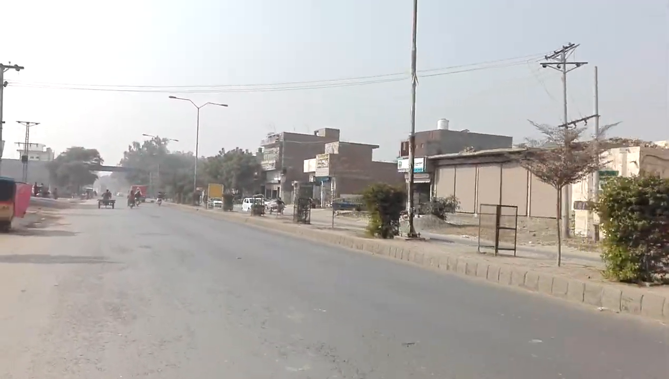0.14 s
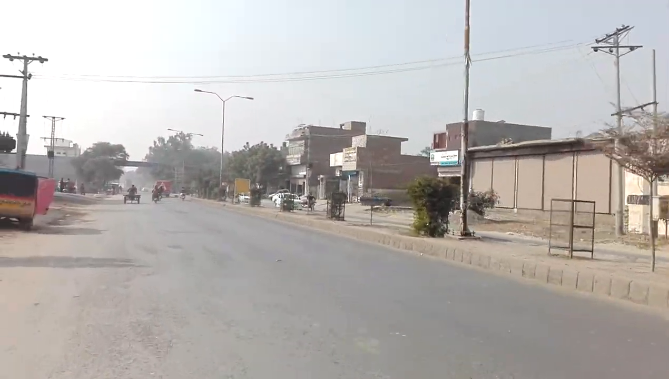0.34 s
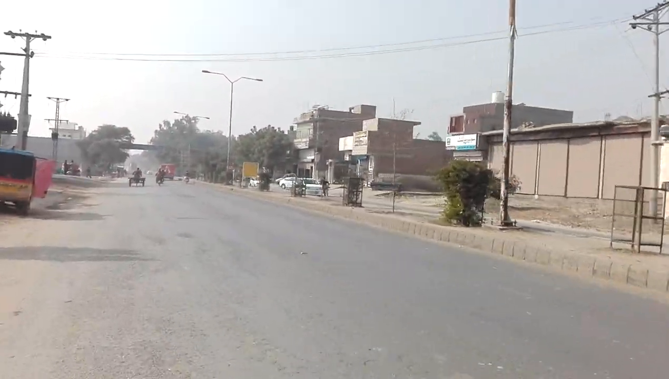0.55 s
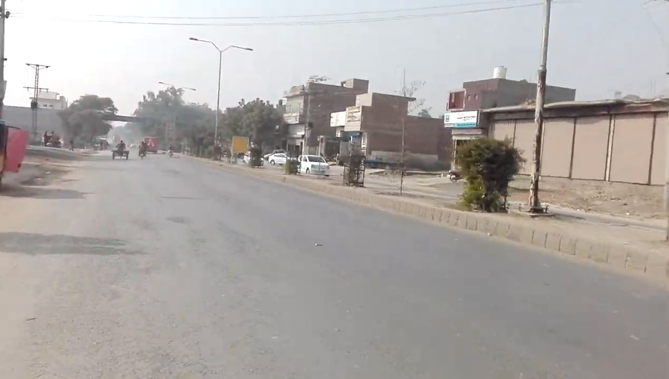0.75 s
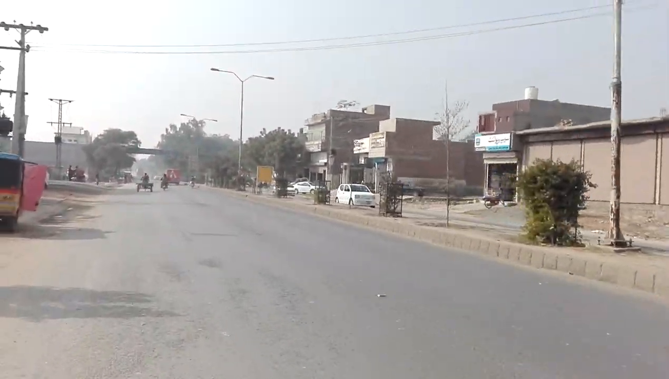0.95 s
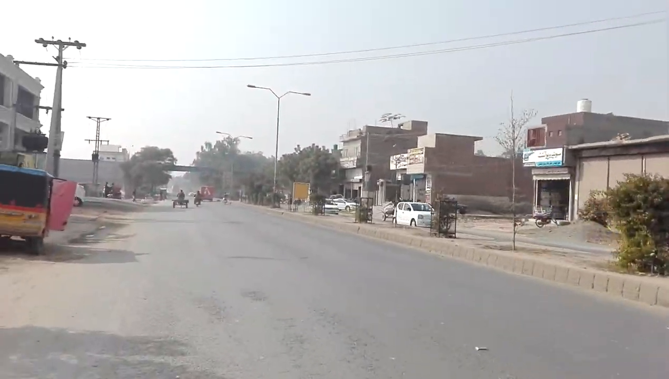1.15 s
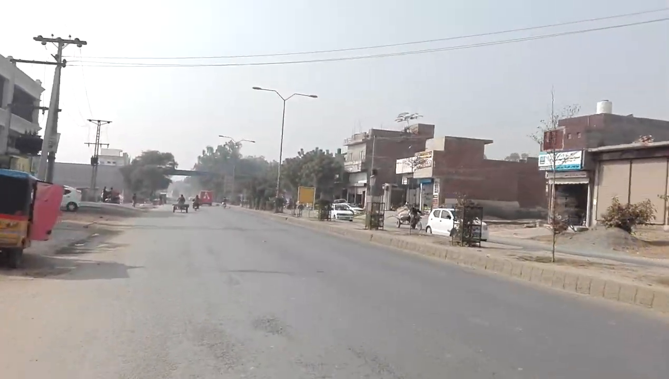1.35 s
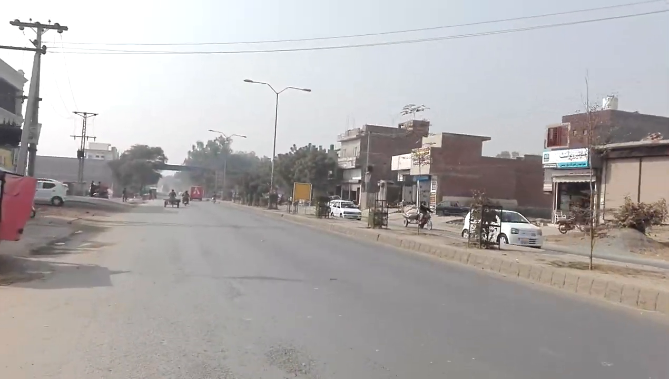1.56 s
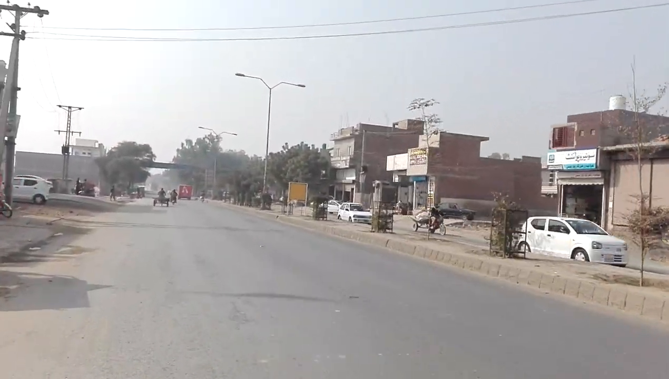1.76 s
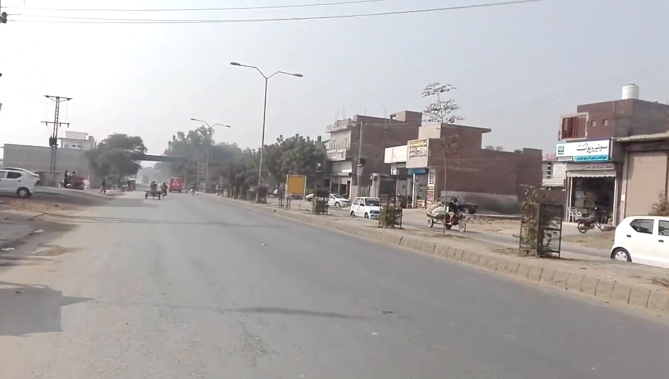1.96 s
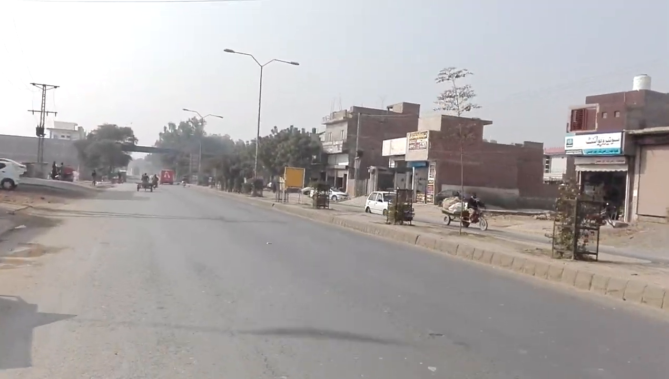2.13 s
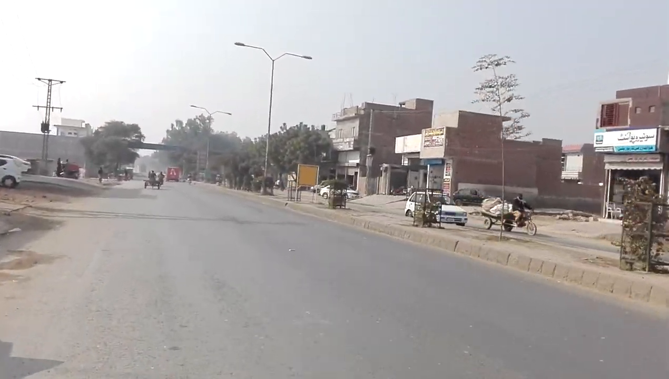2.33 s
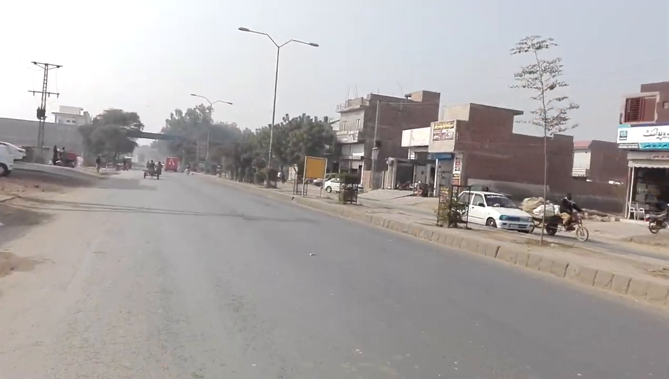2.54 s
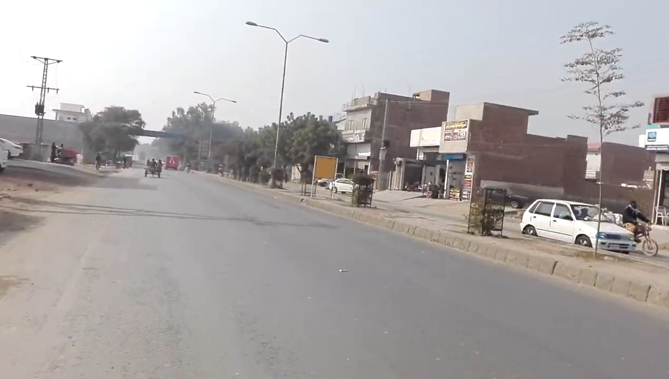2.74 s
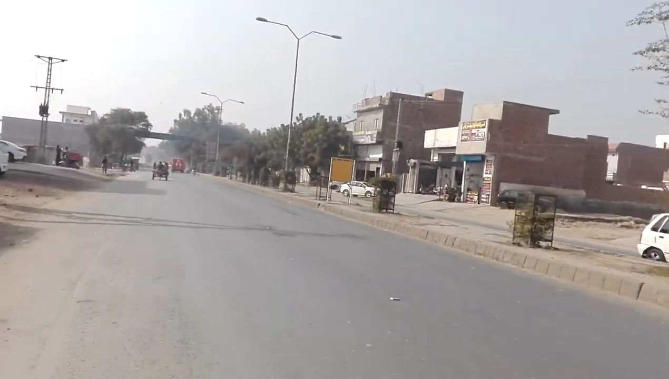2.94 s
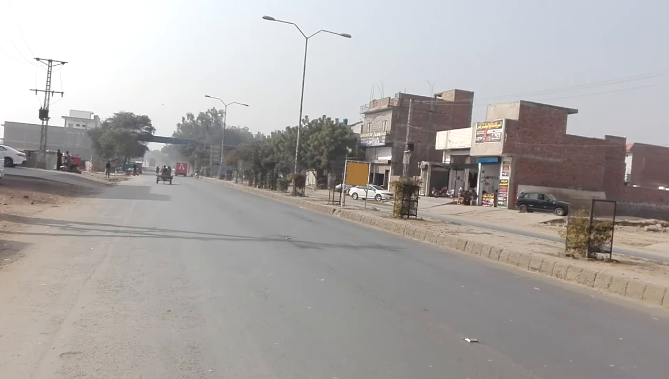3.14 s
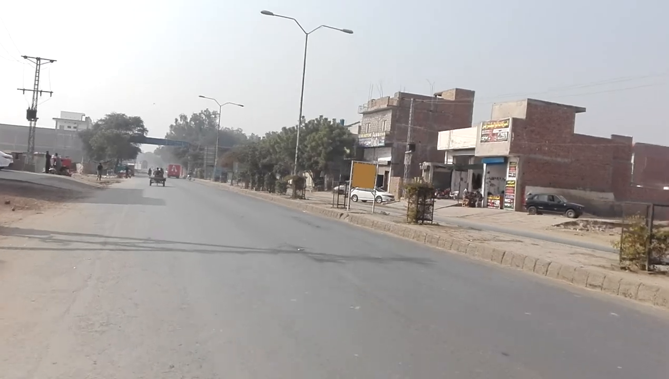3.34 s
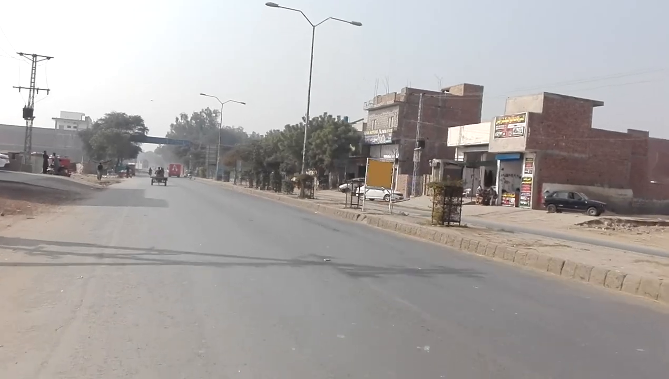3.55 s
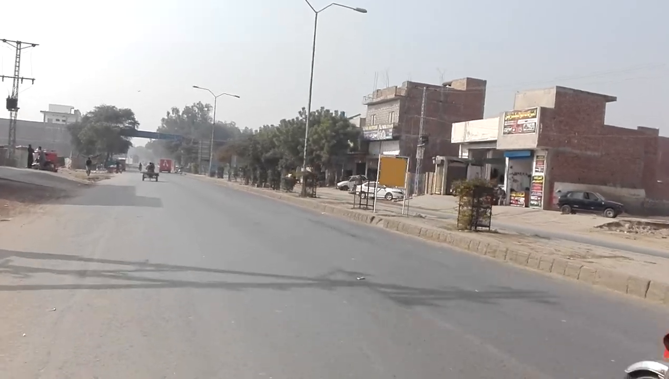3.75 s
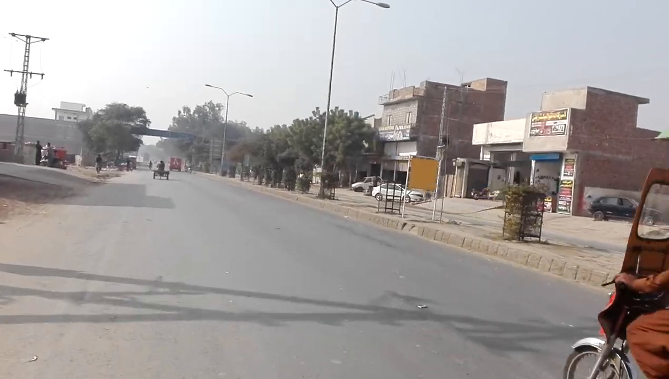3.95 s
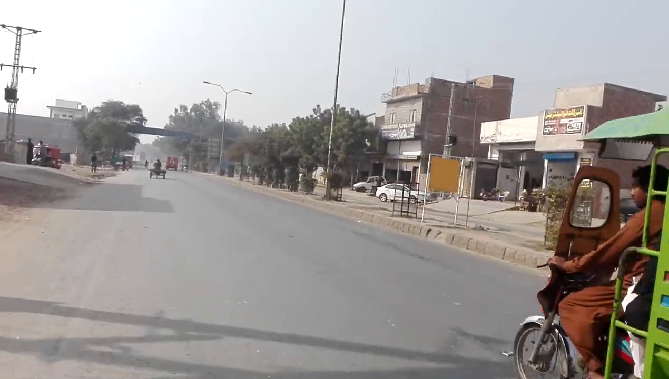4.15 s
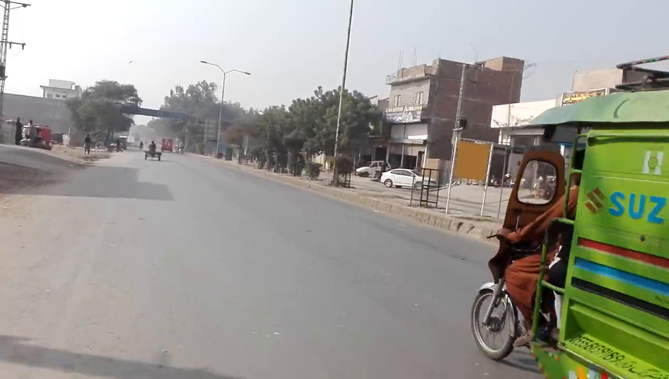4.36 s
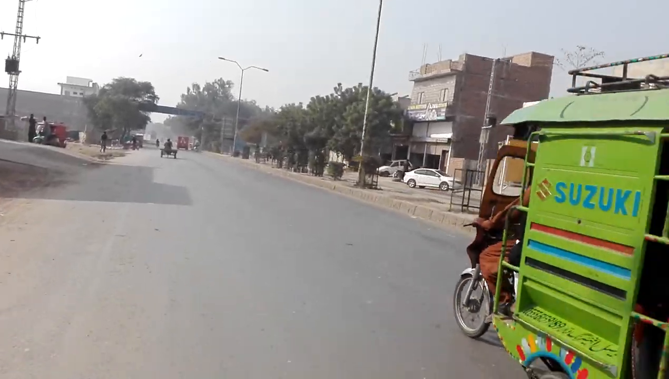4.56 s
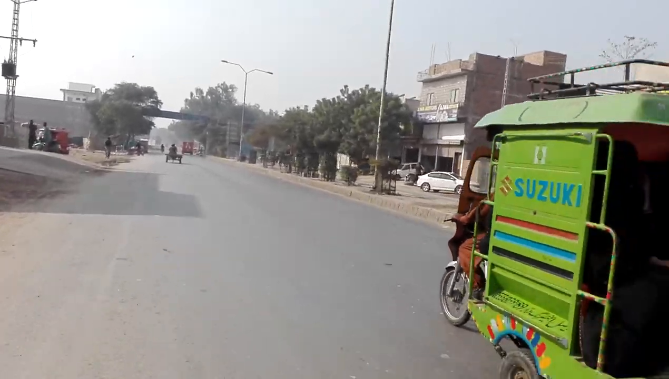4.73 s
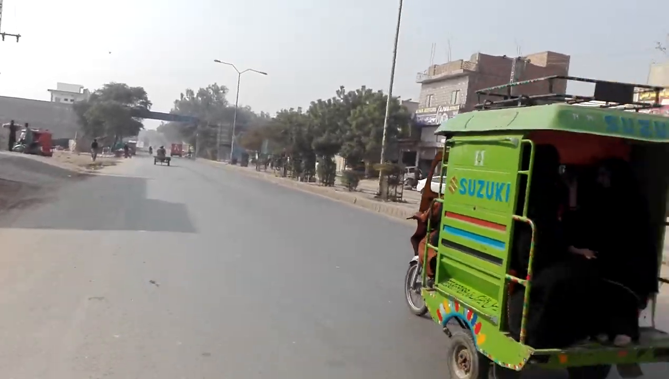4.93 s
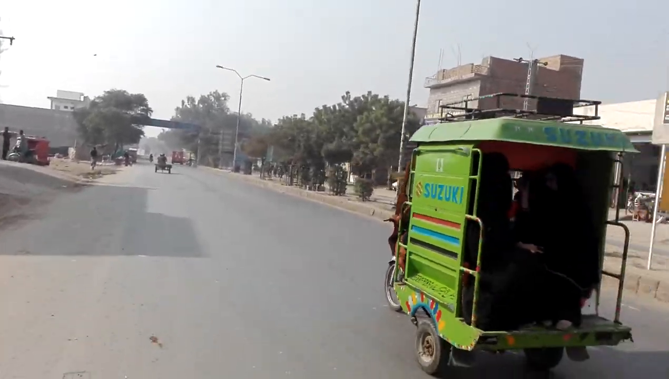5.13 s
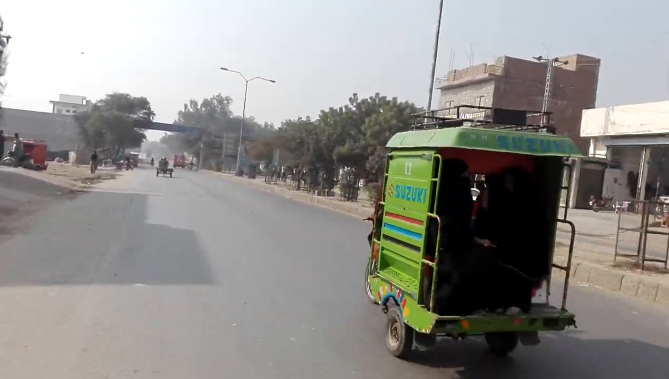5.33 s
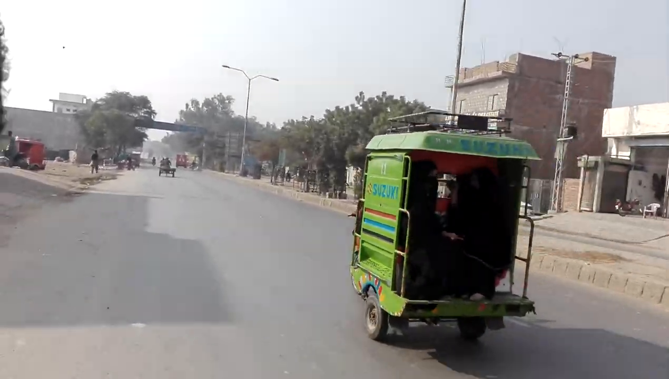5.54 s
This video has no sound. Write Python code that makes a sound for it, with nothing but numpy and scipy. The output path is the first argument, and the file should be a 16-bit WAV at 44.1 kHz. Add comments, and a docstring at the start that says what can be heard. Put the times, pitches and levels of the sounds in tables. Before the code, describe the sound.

Heard from an open vehicle on a wide city road: low traffic rush and gusty wind with dull thumps on a bare microphone. A single-cylinder three-wheeler putters steadily, at first dull and blurred by the street, then louder with a wavering nasal pipe tone. Around four seconds it draws level, its exhaust turning crisp and raspy, then begins to pull ahead. A loose fitting ticks and rattles now and then.

```python
"""A wide city road, heard from an open vehicle: a small single-cylinder three-wheeler comes up and overtakes.
Its exhaust barks about 49 times a second, each firing ringing the pipe and silencer; it is blurred by
the street when far and sharp once past. Sine waves at multiples of the firing rate make its throb.
Shaped noise makes the road's rush, the tyres' hiss and the wind, and single eddies slap the bare microphone.
A loose fitting knocks now and then with short rings."""
import sys
import numpy as np
from scipy import signal
from scipy.fft import rfft, irfft, next_fast_len
from scipy.io import wavfile
from scipy.ndimage import map_coordinates

SR = 44100
rng = np.random.default_rng(int(sys.argv[2]) if len(sys.argv) > 2 else 0)


def dump(signal):
    """Clip the signal to [-1, 1] and save it as 16-bit WAV at the path in sys.argv[1]."""
    limited = np.clip(np.atleast_2d(signal).T, -1, 1)
    pcm = np.round(limited * 32767).astype(np.int16)
    wavfile.write(sys.argv[1], SR, pcm)


def to_linear_factor(level_db):
    """Convert decibel levels (scalar or array-like) to linear amplitude factors."""
    exponent = np.asarray(level_db, float) / 20
    return 10 ** exponent


N = 246519  # length in samples

# Tyres and far traffic. Each row: frequency in Hz, relative level per Hz in dB.
ROAD_SPECTRUM = [(150, -13), (250, 0.5), (414, -1), (561, -22), (1260, 2.5), (1490, -6), (1680, -9),
                 (2640, -16), (2870, -15), (4380, -23), (5640, -68), (8030, -59), (14000, -38)]
ROAD_DB = -49.5
# Escaping gas, also used for tyre hiss. Each row: frequency in Hz, relative level per Hz in dB.
HISS_SPECTRUM = [(3820, -51), (6500, 3.5), (7020, 1), (7980, -4), (10900, -5.5), (12800, -16), (14000, -28)]

# Slow wind pressure. Each row: frequency in Hz, relative level per Hz in dB.
BUFFET_SPECTRUM = [(7.1, -60), (12, 4.5), (36, -1), (54, 5.5), (200, -19), (260, -62.5), (440, -120)]
# Faster wind noise. Each row: frequency in Hz, relative level per Hz in dB.
FLUTTER_SPECTRUM = [(50, -50), (90, 4), (130, 3), (200, -4), (300, -13.5), (500, -24.5), (900, -39),
                    (2000, -54), (5000, -110)]
# Gusts. Each row: time of full strength in seconds, hold in seconds, buffet in dB, flutter in dB.
GUSTS = [(0.0, 0.01, -21, -29.5), (0.232, 0.26, -32, -34), (0.785, 0.65, -27.5, -34),
         (1.754, 0.05, -40, -49), (1.948, 0.36, -34, -54), (2.525, 0.28, -26, -29), (2.99, 0.15, -31, -31),
         (3.506, 0.15, -34, -37), (3.736, 0.18, -28, -28), (4.118, 0.35, -18.5, -23),
         (4.585, 0.037, -24, -22.5), (4.75, 0.24, -29, -27.5), (5.1, 0.18, -25, -23)]
GUST_RISE_S, GUST_FALL_DB_PER_S = 0.048, 77
# Wind between gusts. Each row: time in seconds, buffet in dB, flutter in dB.
CALM_WIND = [(0, -46, -50), (3, -37, -42), (5.59, -28.5, -31.5)]
# Single eddies at the microphone. Each row: start in seconds, peak in dB, time from middle to peak in ms.
SLAPS = [(0.1, -22, 1.4), (0.283, -12, 2.2), (0.422, -15.5, 2), (0.455, -25, 3.1), (0.783, -19, 2.4),
         (0.857, -16.5, 2.5), (1.023, -11, 1.87), (1.155, -12, 1.84), (1.206, -17, 2.5),
         (1.304, -21.5, 2.1), (1.362, -14.5, 2.1), (2.065, -26, 2.2), (2.113, -24, 2.3), (2.573, -17, 1.9),
         (2.609, -13, 2.06), (2.688, -16.5, 2.5), (2.797, -18, 3.1), (4.039, -20, 1.9), (4.12, -18, 2.7),
         (4.154, -11, 2.2), (4.189, -14, 3.3), (4.239, -20, 2.1), (4.358, -13.5, 2.4), (4.419, -11.5, 2.7),
         (4.578, -11.5, 2), (4.649, -16, 2.4), (4.964, -14.5, 2), (5.228, -13.5, 2.2)]
SLAP_BUILDS_S = 0.011  # from the start to the middle of a slap

# The loose fitting's knocks. Each row: start in seconds, relative strength in dB, brightness in dB per octave.
KNOCKS = [(0.283, -26, 2), (0.506, -27, -5.5), (0.768, -15, -1.5), (0.881, -19, 4.5), (1.727, -21.5, 6),
          (1.763, -21, 4.5), (1.774, -24, 2), (1.781, -29, -1), (1.975, -20.5, 0), (2.529, -17.5, -2.5),
          (2.919, -14.5, 2), (2.957, -20.5, -4), (2.999, -12.5, 4), (3.239, -13.5, 7), (3.261, -20, -2.5),
          (3.835, -15.5, 0.5), (4.106, -19.5, 7), (4.485, -18, -3), (4.638, -18.5, -1), (4.696, -18.5, 3),
          (4.966, -15.5, -2), (5.126, -14, 9.5), (5.251, -17, 4), (5.314, -18.5, 5.5), (5.539, -15.5, 8.5),
          (5.559, -17, 1)]
# Tones of the fitting. Each row: frequency in Hz, typical level in dB, time to fall 60 dB in seconds.
FITTING_TONES = [(457, -2, 0.012), (940, -0.5, 0.0013), (1340, 3.5, 0.0063), (1820, 0.5, 0.0042),
                 (3085, 3.5, 0.0046), (5800, -20, .005)]

# Firings counted since the start. Each row: time in seconds, number of firings.
FIRINGS = [(0.0, -0.44), (0.7, 34.48), (1.4, 69.12), (2.8, 138.12), (3.15, 155.47), (4.55, 224.61),
           (5.585, 275.57)]
# Low engine tones. Each row: multiple of the firing rate, typical level in dB at the nearest.
THROB_TONES = [(1, -45), (2, -39.5), (3, -50), (4, -45), (5, -50), (6, -55.5), (7, -51), (8, -52.5)]
# The three-wheeler comes near, its treble clearing last.
# Each row: time in seconds, nearness in dB, treble shadow in dB.
APPROACH = [(0, -19.5, -24), (0.75, -14, -22), (1.2, -16, -27), (1.5, -11.5, -24), (1.75, -10, -20.5),
            (2.0, -8, -22), (2.4, -6, -16), (2.75, -3.5, -10), (3.0, -2.5, -3.5), (3.5, 0.2, -1.2),
            (3.9, -1.5, -1.3), (4.2, -1, 0.6), (4.6, 3.5, 2), (4.8, 3, 0.3), (5.05, 3.5, 3.5),
            (5.3, -1, 2.5), (5.59, -5, 4.5)]
# One row each for silencer, rasp, shell, gas hiss and tyre hiss: base level in dB,
# share of nearness, share of treble shadow, change in dB while it pulls ahead.
PART_LEVELS = [(-44.5, 0.52, 0.01, -6), (-45.5, 1, 0.01, 0.5), (-46.5, 0.51, 0.89, -0.5),
               (-63, 0.01, 0.99, 4.5), (-57.5, 0.01, 1, -17)]
ALONGSIDE_S = 4.2  # time at which it is level with the microphone
TURN_S, AHEAD_S = 0.28, 1.2  # tail pipe swings into view; pulls ahead
FAR_BLUR, NEAR_BLUR = 0.43, 0.092  # power share by way of the street, before and after the pipe is in view

# The pipe tones wander and trade strength. Each row: time in seconds, pipe frequency in Hz,
# pipe level in dB, whine level in dB, second pipe level in dB.
PIPE_TONES = [(0, 1244, -55.5, -66, -66), (0.75, 1277, -52, -56, -60), (1.1, 1303, -48.5, -51.5, -60.5),
              (1.5, 1300, -56, -45.5, -52.5), (1.75, 1327, -49.5, -45, -59), (2.25, 1176, -47, -41.5, -49),
              (2.5, 1276, -42, -49.5, -60), (2.75, 1257, -40.5, -42.5, -68), (3.0, 1303, -42, -46, -48.5),
              (3.25, 1400, -39, -33, -53), (3.5, 1297, -41, -50, -47), (3.75, 1290, -40, -46, -41.5),
              (4.0, 1257, -40, -51, -46), (4.25, 1295, -39, -51, -48.5), (4.5, 1340, -40.5, -45.5, -40),
              (4.7, 1390, -43, -60, -44.5), (4.9, 1350, -47, -55, -48), (5.25, 1220, -52.5, -50, -50.5),
              (5.58, 1240, -40.5, -69, -56)]
# Basic widths in Hz of pipe, whine and second pipe, in that order.
PIPE_WIDTHS = [95, 50, 85]
# Silencer box. Each row: frequency in Hz, width in Hz, relative level in dB.
SILENCER_MODES = [(850, 460, -6), (1133, 144, 1.5)]
# Tail pipe edge. Each row: frequency in Hz, width in Hz, relative level in dB.
RASP_MODES = [(1815, 300, 1), (2180, 910, -1.5), (2770, 870, -2.5)]
# Thin outer shell. Each row: frequency in Hz, width in Hz, relative level in dB.
SHELL_MODES = [(3724, 254, 7), (5200, 700, 4.5), (6970, 980, -5.5)]
# Thin ring near 5.1 kHz while the engine is far. Each row: middle in seconds, half length in seconds, level in dB.
FLICKER = [(0.128, 0.1, -65.5), (0.58, 0.087, -67), (0.81, 0.083, -64.5), (1.095, 0.085, -69.5),
           (1.7, 0.15, -75), (2.4, 0.15, -68)]
# The road reflects the tail pipe once it is in view; the lag shrinks as the distance grows.
BOUNCE_STRENGTH, ROUGH_ROAD_HZ = 0.6, 5500  # the rough surface scatters the treble
LAG_ALONGSIDE_MS, RECEDES_PER_S = 1.16, 1.1

# Time in seconds and frequency in Hz within the sound of one firing
PULSE_SIZE = 2048
PULSE_S = np.arange(PULSE_SIZE) / SR
PULSE_HZ = np.fft.rfftfreq(PULSE_SIZE, 1 / SR)


def unit(x):
    """Scaled to rms 1 along the last axis."""
    return x / np.sqrt(np.mean(np.abs(x) ** 2, axis=-1, keepdims=True) + 1e-20)


def along(points, hz):
    """Gain of (Hz, dB) points joined on a log frequency axis."""
    f, db = np.transpose(points)
    return to_linear_factor(np.interp(np.log(hz + 1), np.log(f + 1), db))


def curves(rows, t):
    """Each column after the time, read at the times t."""
    s, *columns = np.transpose(rows)
    return [np.interp(t, s, column) for column in columns]


def wobble(rate):
    """A smooth random curve through rate random points a second."""
    knots = rng.standard_normal(int(N * rate / SR) + 4)
    return map_coordinates(knots, [np.arange(N) * rate / SR])


def rush(spectrum):
    """Noise coloured by a spectrum, with rms 1."""
    m = next_fast_len(N)
    coloured = rfft(rng.standard_normal(m)) * along(spectrum, np.fft.rfftfreq(m, 1 / SR))
    return unit(irfft(coloured, m)[:N])


def street(x, t60):
    """The blurred answer of hard surfaces nearby: a new random fading tail every fifth of a second."""
    out, hop, t = np.zeros(N + SR), SR // 5, np.arange(SR // 4) / SR
    for start in range(0, N, hop):
        tail = rng.standard_normal(len(t)) * to_linear_factor(-60 * t / t60)
        wet = signal.fftconvolve(x[start:start + hop], tail / np.linalg.norm(tail))
        out[start:start + len(wet)] += wet
    return out[:N]


def in_view(t):
    """How far the tail pipe has swung into view, 0 to 1."""
    return np.clip((t - ALONGSIDE_S) / TURN_S, 0, 1)


def passing(t):
    """Level of each part in dB, and the power share heard by way of the street, at the times t."""
    near_db, shadow_db = curves(APPROACH, t)
    ahead = np.clip((t - ALONGSIDE_S) / AHEAD_S, 0, 1)
    levels = [db + near * near_db + shadow * shadow_db + ahead_db * ahead
              for db, near, shadow, ahead_db in PART_LEVELS]
    return levels, np.clip(FAR_BLUR + (NEAR_BLUR - FAR_BLUR) * in_view(t), 0, 1)


def road():
    """Far traffic as a slowly breathing rush of noise, and the hiss of the three-wheeler's tyres."""
    tyre_db = passing(np.arange(N) / SR)[0][-1]
    traffic = to_linear_factor(ROAD_DB + wobble(3)) * rush(ROAD_SPECTRUM)
    return traffic + to_linear_factor(tyre_db) * rush(HISS_SPECTRUM)


def wind():
    """Gusts rise fast and fade; eddies push on the bare microphone in lumps, the faster flutter rides on them."""
    t = np.arange(N) / SR
    power = to_linear_factor(np.array(curves(CALM_WIND, t))) ** 2
    for s, hold, *db in GUSTS:
        rise = np.clip((t - s) / GUST_RISE_S + 1, 0, 1) ** 2
        fall = to_linear_factor(-GUST_FALL_DB_PER_S * np.maximum(t - s - hold, 0))
        power = power + (to_linear_factor(np.array(db)[:, None]) * rise * fall) ** 2
    lumps = wobble(22)
    buffet = unit(to_linear_factor(0.38 * lumps) * rush(BUFFET_SPECTRUM))
    flutter = unit(to_linear_factor(1.3 * lumps + 2.01 * wobble(45)) * rush(FLUTTER_SPECTRUM))
    noise = np.sqrt(power[0]) * buffet + np.sqrt(power[1]) * flutter
    return noise + slaps(t)


def slaps(t):
    """Each eddy swings the pressure once down and once up."""
    out = np.zeros(N)
    for s, db, ms in SLAPS:
        u = (t - s - SLAP_BUILDS_S) * 1000 / ms
        out += to_linear_factor(db) * u * np.exp((1 - u * u) / 2)
    return out


def knocks():
    """Each knock rings the fitting briefly; a harder contact tilts the ring towards the treble."""
    out, t = np.zeros(N + SR), np.arange(SR // 20) / SR
    for s, db, bright_db in KNOCKS:
        ring = np.zeros(len(t))
        for hz, level, t60 in FITTING_TONES:
            tone_db = level + 1.5 * rng.standard_normal() + bright_db * np.log2(hz / 1340)
            ring += to_linear_factor(tone_db - 60 * t / t60) * np.sin(2 * np.pi * hz * t)
        out[round((s + .0012) * SR):][:len(t)] += to_linear_factor(db - 7.5) * ring
    # the parts meet over a fraction of a millisecond, which rounds off the start
    contact = np.exp(-.5 * (np.arange(-12, 13) / SR / .00007) ** 2)
    out = np.convolve(out[:N], contact / contact.sum(), "same")
    return out + to_linear_factor(-4.5) * street(out, t60=0.073)


def throb():
    """Low multiples of the firing rate as sine waves, swelling as the engine comes near."""
    t = np.arange(N) / SR
    turns, near_db = curves(FIRINGS, t)[0], curves(APPROACH, t)[0]
    tone = np.zeros(N)
    for k, db in THROB_TONES:
        phase = k * turns + 0.011 * wobble(12)
        tone += to_linear_factor(db + 2.5 * wobble(5)) * np.sin(2 * np.pi * phase)
    return np.sqrt(2) * to_linear_factor(0.71 * (near_db - near_db.max())) * tone


def resonance(hz, width_hz):
    """Frequency response of one resonance, which rings only after it is struck."""
    f = PULSE_HZ
    return 1j * f * width_hz / (hz * hz - f * f + 1j * f * width_hz)


def steep(hz, width_hz):
    """A resonance with steep sides: a narrow one times one four times as wide."""
    return unit(resonance(hz, width_hz) * resonance(hz, 4 * width_hz))


def modes(table, hz, width_hz):
    """A row of resonances of alternating sign, inside one broad resonance."""
    row = sum((-1) ** k * to_linear_factor(db) * resonance(f, w) for k, (f, w, db) in enumerate(table))
    return unit(row * resonance(hz, width_hz))


def gas_gust(rise_s, t60_s):
    """Spectra of short noise bursts, one for each firing, as gas rushes out and dies away."""
    noise = rng.standard_normal((len(t60_s), PULSE_SIZE))
    return unit(rfft(noise * (1 - np.exp(-PULSE_S / rise_s)) * to_linear_factor(-60 * PULSE_S / t60_s)))


def pipe_bark(when, low, spread):
    """The pressure step and gas gust ring the long pipe and the silencer box."""
    pipe_hz, pipe_db, whine_db, _ = curves(PIPE_TONES, when)
    box_db = passing(when)[0][0]
    pipe = to_linear_factor(pipe_db) * steep(pipe_hz, PIPE_WIDTHS[0]) - to_linear_factor(whine_db) * steep(1455, PIPE_WIDTHS[1])
    late = np.exp(-2j * np.pi * PULSE_HZ * 0.00152)  # the long pipe speaks after the shell
    bark = pipe * late * (0.89 + 0.082 * gas_gust(0.0015, 0.047 * spread))
    # growl of the pipe's low end
    growl = to_linear_factor(pipe_db - 6.5) * steep(396, 350) * (0.3 + 0.96 * gas_gust(0.0004, 0.039 * spread))
    box = to_linear_factor(box_db) * modes(SILENCER_MODES, 880, 610) * (0.56 + 0.72 * gas_gust(0.0069, 0.091 * spread))
    return low * (bark + growl + box)


def pipe_treble(when, mid, top, spread):
    """The second pipe tone, the pipe edge, the thin shell and escaping gas, with a bounce off the road."""
    high_db = curves(PIPE_TONES, when)[3]
    _, rasp_db, shell_db, hiss_db, _ = passing(when)[0]
    strength = BOUNCE_STRENGTH * in_view(when)
    # looking into the open pipe end, its second resonance is a little higher and broader
    second = steep(2635 + 230 * strength, PIPE_WIDTHS[2] + 400 * strength)
    second = to_linear_factor(high_db) * second * (0.71 + 0.44 * gas_gust(0.00081, 0.026 * spread))
    rasp = to_linear_factor(rasp_db) * modes(RASP_MODES, 2370, 1500) * (0.66 + 0.97 * gas_gust(0.00037, 0.054 * spread))
    shell = to_linear_factor(shell_db) * modes(SHELL_MODES, 5960, 5200) * (0.11 + 0.88 * gas_gust(0.00015, 0.028 * spread))
    hiss = to_linear_factor(hiss_db) * unit(along(HISS_SPECTRUM, PULSE_HZ)) * gas_gust(0.00042, 0.025 * spread)
    treble = mid * (second + rasp) + top * (shell + hiss)
    lag_s = LAG_ALONGSIDE_MS / 1000 / np.hypot(1, RECEDES_PER_S * (when - ALONGSIDE_S))
    mirror = strength * np.exp(-(PULSE_HZ / ROUGH_ROAD_HZ) ** 2)
    bounce = 1 + mirror * np.exp(-2j * np.pi * PULSE_HZ * lag_s)
    return treble * bounce / np.sqrt(1 + mirror ** 2)


def far_ring(when, spread):
    """A thin ring near 5.1 kHz that comes and goes in patches."""
    level = sum(to_linear_factor(db) * np.exp(-.5 * ((when - middle) / half) ** 4) for middle, half, db in FLICKER)
    return level * steep(5110, 350) * gas_gust(0.0035, 0.21 * spread)


def exhaust():
    """Each firing is a pressure step plus a short gust of gas, ringing the pipe, the silencer and its shell."""
    s, firings = np.transpose(FIRINGS)
    at = np.interp(np.arange(np.ceil(firings[0]), firings[-1]), firings, s)
    luck = rng.standard_normal((len(at), 4))  # no two firings alike
    at = np.clip(at + .001 + .00015 * luck[:, 0], 0, None)
    low, mid, top = to_linear_factor(0.27 * luck[:, 1:2]), to_linear_factor(1.37 * luck[:, 2:3]), to_linear_factor(2.8 * luck[:, 3:4])
    when = at[:, None]
    spread = 0.49 + passing(when)[1]  # near echoes draw a far gust out
    spectra = pipe_bark(when, low, spread) + pipe_treble(when, mid, top, spread) + far_ring(when, spread)
    firing_rate = np.mean(np.diff(firings) / np.diff(s))
    pulses = irfft(spectra, PULSE_SIZE) * np.sqrt(SR / firing_rate)  # energy of one firing
    where = np.round(at * SR).astype(int)[:, None] + np.arange(PULSE_SIZE)
    direct = np.bincount(where.ravel(), pulses.ravel(), N + SR)[:N]
    # house fronts and parked cars blur part of the sound
    share = passing(np.arange(N) / SR)[1]
    return np.sqrt(1 - share) * direct + np.sqrt(share) * street(direct, t60=0.2)


def scene():
    """All sources at the one microphone."""
    return (road() + wind() + knocks() + throb() + exhaust())[None]


def low_pass(x):
    """Removes everything above the highest recorded frequency."""
    return signal.sosfilt(signal.butter(12, 14140, fs=SR, output="sos"), x)


def record(dry):
    """The loudest peaks are softly clipped, bending towards a ceiling."""
    ceiling = .49
    mix = dry / (1 + np.abs(dry / ceiling) ** 6) ** (1 / 6)
    return low_pass(mix)


dry = scene()
out = record(dry)
dump(out)
```